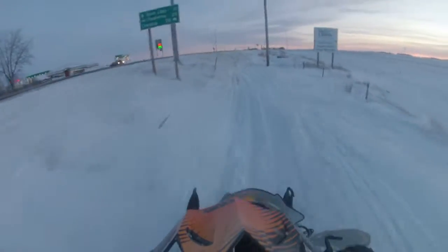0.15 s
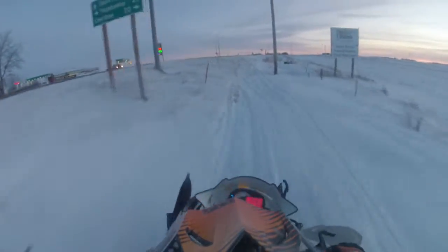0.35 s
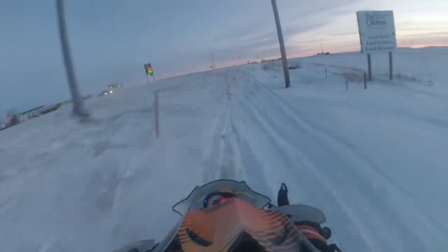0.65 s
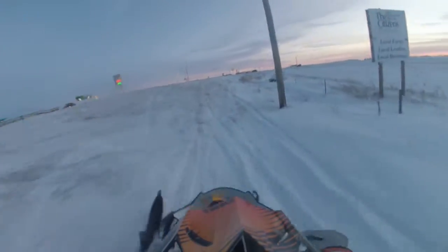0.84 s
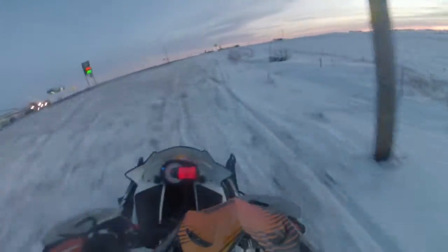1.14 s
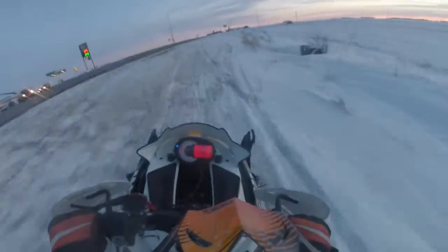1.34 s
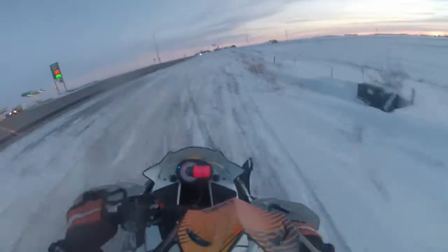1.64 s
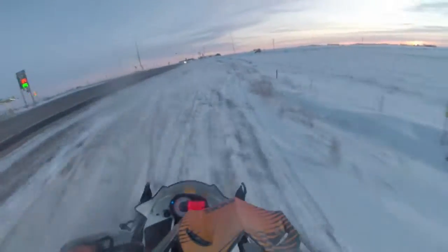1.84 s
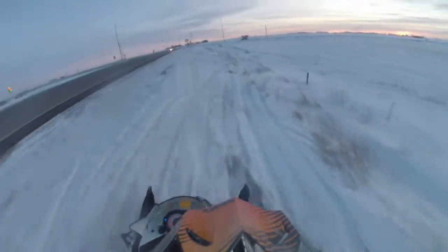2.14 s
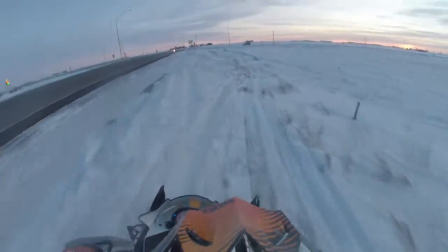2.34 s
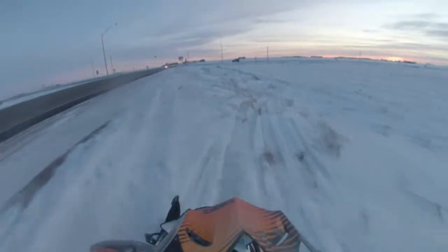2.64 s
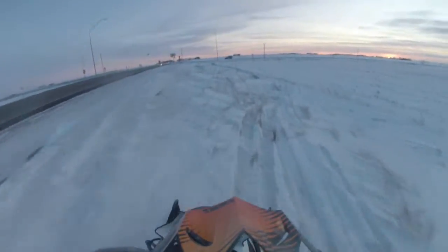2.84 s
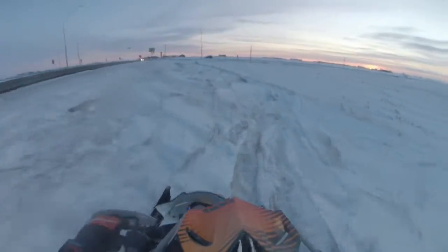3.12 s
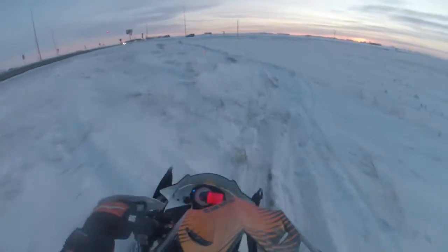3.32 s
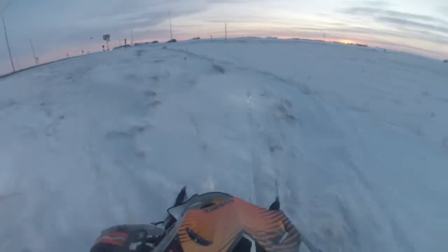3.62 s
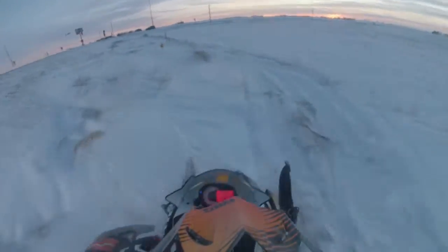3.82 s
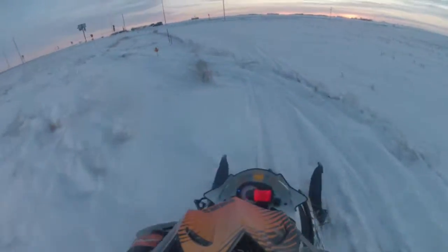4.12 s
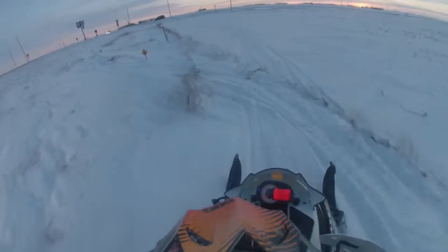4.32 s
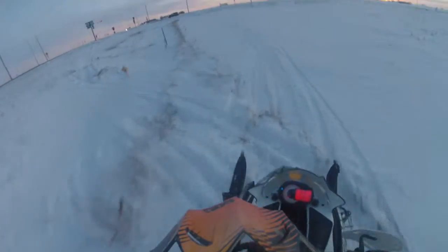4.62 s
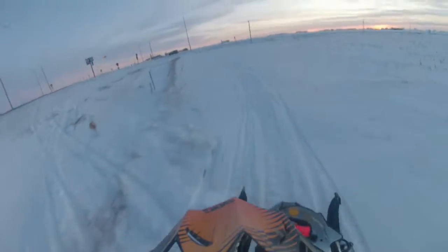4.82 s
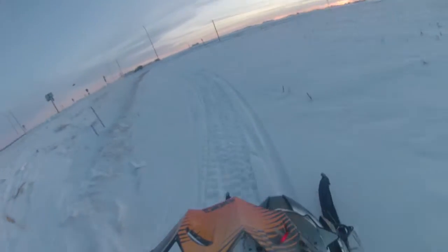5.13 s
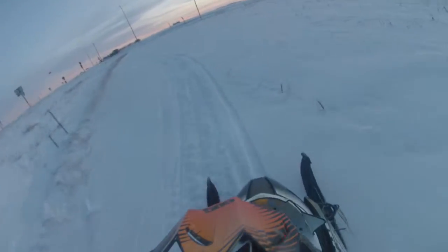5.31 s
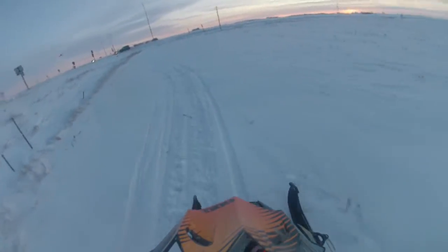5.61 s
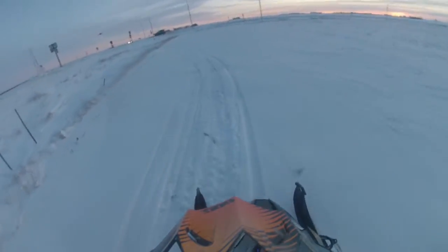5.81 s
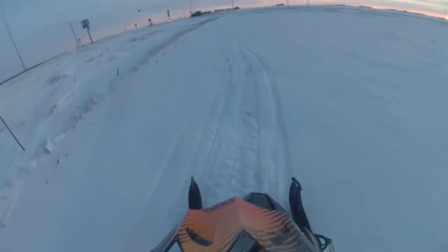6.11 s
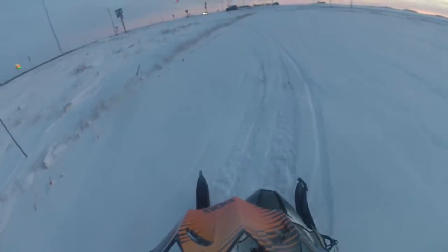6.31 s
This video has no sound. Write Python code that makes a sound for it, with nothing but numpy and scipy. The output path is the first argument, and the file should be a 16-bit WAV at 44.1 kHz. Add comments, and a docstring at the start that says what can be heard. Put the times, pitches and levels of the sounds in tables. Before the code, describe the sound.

A two-stroke snowmobile revs hard through buffeting wind and hissing snow, coasts down to idle, then gives four short throttle blips.

```python
"""A two-stroke snowmobile on hard snow, heard from a camera case on the rider's helmet.
0-1.6 s: it revs up; the exhaust sings and rasps with each firing, and growls at the top.
Track and skis rush and sizzle on the snow, the chassis drones, wind buffets the case.
1.6-5 s: it coasts down to idle; snow and wind fade as the sled slows; an ice crumb ticks on the case.
From 5.1 s: four burbling blips of throttle, with a second crumb after the first blip."""
import sys
import numpy as np
from scipy import signal
from scipy.fft import rfft, irfft, next_fast_len
from scipy.io import wavfile
from scipy.ndimage import uniform_filter1d, map_coordinates

SR = 44100
rng = np.random.default_rng(int(sys.argv[2]) if len(sys.argv) > 2 else 0)


def waveform_to_disk(signal):
    """Save audio, clipped to [-1, 1], as 16-bit WAV at the path in sys.argv[1]."""
    frames = np.transpose(np.atleast_2d(signal))
    scaled = np.clip(frames, -1, 1) * 32767
    samples = np.round(scaled).astype(np.int16)
    wavfile.write(sys.argv[1], SR, samples)


N = 284886

# how hard track and skis work the snow, mostly with speed: (time [s], pace [dB])
SLED_PACE = [(0, -0.5), (.55, -1), (.86, 0.9), (1.03, -1.5), (1.21, 2.5), (1.31, -1), (1.38, 4.5),
             (1.87, 6), (2.15, 2), (2.7, 0.5), (2.85, -2), (3.65, -5), (3.95, -8), (4.15, -8), (4.65, -14),
             (5.65, -13), (6.46, -19)]


def amp(db):
    """Decibels to gain."""
    return 10 ** (np.asarray(db) / 20)


def unit(x):
    """x at rms 1."""
    return x / np.sqrt(np.mean(x ** 2) + 1e-20)


def along(points, hz):
    """Interpolate (frequency, value) points on a log axis."""
    at_hz, values = np.transpose(points)
    return np.interp(np.log(hz + 1), np.log(at_hz + 1), values)


def curve(points):
    """Interpolate (time, value) points at every sample."""
    return np.interp(np.arange(N) / SR, *np.transpose(points))


def wobble(rate_hz):
    """Smooth random curve, rate_hz knots a second."""
    knots = rng.standard_normal(int(N * rate_hz / SR) + 4)
    coarse = np.arange(0, N + 16, 16)
    return np.interp(np.arange(N), coarse, map_coordinates(knots, [coarse * rate_hz / SR]))


def swell(at_s, width_s):
    """Gaussian rise and fall."""
    return np.exp(-((np.arange(N) / SR - at_s) / width_s) ** 2)


def noise():
    """White noise."""
    return rng.standard_normal(N)


def filtered(x, response):
    """x through a gain given as a function of frequency."""
    size = next_fast_len(N + 8192)
    return irfft(rfft(x, size) * response(np.fft.rfftfreq(size, 1 / SR)), size)[..., :N]


def coloured(x, spectrum):
    """x through a spectrum with steep skirts, at rms 1."""
    low_hz, high_hz = spectrum[0][0], spectrum[-1][0]
    skirt = lambda hz: np.clip(hz / low_hz, 0, 1) ** 4 / np.maximum(hz / high_hz, 1) ** 4
    return unit(filtered(x, lambda hz: amp(along(spectrum, hz)) * skirt(hz)))


def tone(order, phase, drift_rad=0):
    """Sine at a multiple of the firing rate, rms 1."""
    return np.sqrt(2) * np.sin(order * phase + drift_rad + rng.uniform(0, 2 * np.pi))


def partial(order, phase, firing_hz, spectrum, drift_rad=0):
    """Fluttering tone, weighted by the resonances it sweeps through."""
    return amp(along(spectrum, order * firing_hz) + 2.52 * wobble(35)) * tone(order, phase, drift_rad)


def engine():
    """Two cylinders fire in turn; load brings out the upper harmonics and the rasp."""
    # one long pull, track dragging the engine, then idle: (time [s], load over idle [dB])
    pull_and_drag = [(0, 1), (.22, 14.5), (.56, 10), (.72, 22), (.92, 27), (1, 22), (1.17, 32),
                     (1.31, 31.5), (1.42, 33.5), (1.58, 30), (1.72, -15), (2.6, -16)]
    idle = [(3.6, 0)]
    load_db = curve(np.vstack([pull_and_drag, idle]))
    blip_db, tilt_db, burble_gain, ring_gain = throttle_blips()
    firing_hz = firing_rate(blip_db)
    phase = 2 * np.pi * np.cumsum(firing_hz * (1 + 0.00476 * wobble(45))) / SR  # no two burns alike
    hum = amp(-41.3 + .38 * load_db + .75 * blip_db) * exhaust_hum(phase, firing_hz, tilt_db)
    bite_gain = amp(-67 + load_db + .6 * blip_db)
    exhaust = hum + bite_gain * pipe_song(phase, firing_hz) + growl(phase, firing_hz)
    ring, rasp = engine_casing(phase, firing_hz)
    casing = ring_gain * ring + (bite_gain + amp(-49)) * rasp  # rattles even with the throttle shut
    return exhaust + casing + burble_gain * burble(phase)


def throttle_blips(ramp_s=0.054):
    """Thumb on the throttle: curves of load [dB], tilt [dB/harmonic], burble gain and ring gain."""
    # (start [s], length [s], load [dB], tilt [dB/harmonic], burble [dB], casing ring [dB])
    blips = [(5.11, .19, 8.5, 4, -46, -56), (5.54, .19, 7, 4, -39, -46), (5.99, .19, 9, .5, -39, -45),
             (6.33, .16, 9.5, .5, -42, -42.5)]
    starts_s, lengths_s, load_db, tilt_db, burble_db, ring_db = np.transpose(blips)
    ramp = lambda at_s: np.clip((np.arange(N) / SR - at_s) / ramp_s + .5, 0, 1)
    gates = np.array([ramp(on_s) - ramp(off_s) for on_s, off_s in zip(starts_s, starts_s + lengths_s)])
    return load_db @ gates, tilt_db @ gates, amp(burble_db) @ gates, amp(ring_db) @ gates


def firing_rate(blip_db, flywheel_s=.055, hz_per_db=1.64):
    """Firing rate [Hz]; the flywheel makes the revs lag each blip."""
    # revs climb, sink to idle, then the clutch holds them a little higher: (time [s], firing rate [Hz])
    pull = [(0, 157.4), (.1, 163.1), (.22, 174.9), (.32, 185.4), (.43, 189.5), (.6, 190.8), (.71, 203),
            (.81, 226), (.95, 236.6), (1.08, 250.5), (1.21, 254.7), (1.42, 267.3), (1.55, 266.7),
            (1.6, 258.7)]
    coast = [(1.66, 238), (2, 169.7), (3.3, 135.2), (3.999, 120.1), (5.13, 122), (5.28, 128.9),
             (6.46, 131.2)]
    pole = np.exp(-1 / (flywheel_s * SR))
    lagged = lambda x: signal.lfilter([1 - pole], [1, -pole], x)
    return curve(np.vstack([pull, coast])) + hz_per_db * lagged(lagged(blip_db))


def exhaust_hum(phase, firing_hz, tilt_db, rough_rad=.28):
    """Harmonics 1-3: the tuned exhaust favours each at different revs; uneven burns shake them."""
    # (firing rate [Hz], harmonic 1 [dB], harmonic 2 [dB], harmonic 3 [dB])
    tuning = [(122, 0, -14, -19), (131, 0, -14, -21), (141, -1, -18, -22), (155, -2, -12, -17),
              (176, 0, -10, -4), (189, 1, -9, -8), (197, -3, -1, -19), (214, 1, -3, -18),
              (233, 1.5, -3, -12), (243, 0, -14, -13), (256, .5, -21, -8), (267, 6, -8, -4)]
    at_hz, *harmonics_db = np.transpose(tuning)
    out = np.zeros(N)
    for order, tuned_db in enumerate(harmonics_db, 1):
        level_db = np.interp(firing_hz, at_hz, tuned_db) + (order - 1.5) * tilt_db + 2 * wobble(30)
        out += amp(level_db) * tone(order, phase, rough_rad * wobble(60))
    return out


def pipe_song(phase, firing_hz):
    """The pipe sings on harmonics 4-15; unequal cylinders add rough half-order lines."""
    # pipe resonances: (frequency [Hz], gain [dB])
    pipe = [(400, -7), (590, -14), (660, -7), (800, -0.5), (950, -15), (1015, 4.5), (1075, 4), (1170, -4.5),
            (1330, 5.5), (1600, -6.5), (2000, 4), (2400, 1.5), (2680, 0), (2950, -14)]
    song = sum(partial(k, phase, firing_hz, pipe) for k in range(4, 16))
    uneven = sum(partial(k + .5, phase, firing_hz, pipe, wobble(50)) for k in range(1, 11))
    return song + amp(-13) * uneven


def growl(phase, firing_hz, onset_hz=258.3, full_hz=264.9):
    """Uneven burns at top revs add lines between harmonics 2 and 3."""
    lines = unit(tone(7 / 3, phase, wobble(45)) + tone(5 / 2, phase, wobble(45)))
    return amp(-37.5) * np.interp(firing_hz, [onset_hz, full_hz], [0, 1]) * lines


def engine_casing(phase, firing_hz):
    """The casing rings on harmonics 9-16 and rasps with a puff of noise per firing."""
    # casing resonances: (frequency [Hz], gain [dB])
    casing = [(700, -3.5), (1150, -6), (1370, -10), (1510, 7), (1680, -5), (1850, -18), (1950, 4),
              (2100, -12), (2400, -2), (3000, -36), (3500, -10), (5900, -43), (6600, -18), (8500, -29),
              (9200, -23), (10100, -40), (11300, -24.5), (15000, -44)]
    ring = unit(sum(partial(k, phase, firing_hz, casing) for k in range(9, 17)))
    puffs = (1 + np.cos(phase)) ** 2 * (1 + 0.22 * np.cos(phase / 2))
    return ring, coloured(noise() * puffs, casing)


def burble(phase):
    """At low revs about every third burn is weak: a throb below the firing rate."""
    # irregular burns: (frequency [Hz], relative density [dB])
    burns = [(70, -26), (92, -8), (115, -2), (170, -6), (230, -13.5), (420, -12), (700, -27)]
    throb = tone(2 / 3, phase, wobble(20))
    return unit(throb + coloured(noise(), burns))


def track_and_skis(pace_db):
    """Track and skis grind through snow: a low thudding and a mid-band rush."""
    # both: (frequency [Hz], relative density [dB])
    thud_spectrum = [(180, -5.5), (300, 2), (420, -0.5), (600, -4), (740, -1), (920, -6.5), (1200, -2),
                     (1800, -26)]
    rush_spectrum = [(850, -28), (1000, -19), (1150, -7.5), (1300, -4.5), (1420, 2), (1650, -3),
                     (1900, -0.5), (2250, 0), (2420, -5.5), (2620, -5), (2850, -14.5), (3200, -23)]
    thud = amp(-39.5 + pace_db + 0.26 * wobble(24)) * coloured(noise(), thud_spectrum)
    rush = amp(-27 + 0.97 * pace_db) * coloured(noise() * amp(0.14 * wobble(150)), rush_spectrum)
    return thud + rush


def snow_spray(pace_db, fine_hz=8000):
    """The crust breaks in tiny bursts, coloured by the camera case; finer and brighter at speed."""
    # spray: (frequency [Hz], relative density [dB])
    sizzle = [(2300, -42), (2900, -1), (3500, 0), (4300, -4), (5200, -3.5), (5800, -6.5), (7200, -8),
              (8000, -11), (10000, -16.5), (12200, -17.5), (13200, -22.5), (15200, -27)]
    # camera case resonances: (centre [Hz], width [Hz], lift [dB])
    case_modes = [(3924, 160, 6), (4570, 220, 5), (4950, 390, 6), (6540, 570, 7), (8640, 670, 2.5)]
    lift_db = lambda hz: sum(db / (1 + (2 * (hz - centre) / width) ** 2)
                             for centre, width, db in case_modes)
    grains = noise() * amp(0.83 * wobble(700) + 0.66 * wobble(20))
    spray = coloured(filtered(grains, lambda hz: amp(lift_db(hz))), sizzle)
    fine = filtered(spray, lambda hz: hz ** 4 / (hz ** 4 + fine_hz ** 4))
    return amp(-36 + 1.095 * pace_db) * (spray + (amp(0.19 * pace_db) - 1) * fine)


def wind(pace_db, slow_hz=42.6):
    """Eddies buffet the camera case and grow with the pace; gusts swell the slowest."""
    # eddies: (frequency [Hz], relative density [dB])
    buffet = [(8, -4.5), (16, 2), (24, -13.5), (33, -1), (42, 0.5), (48, -1), (57, -21), (75, -25),
              (140, -45)]
    # gusts and helmet jolts: (time [s], half-width [s], lift [dB])
    gusts = [(0.08, 0.042, 9), (.38, .14, 10), (1.001, 0.11, 10), (1.271, 0.034, 11), (1.445, 0.054, 6),
             (1.792, 0.077, 5.5), (3.131, 0.1, 9), (3.762, 0.082, 7.5), (4.507, 0.033, 7),
             (5.332, 0.086, 11.5), (5.822, 0.061, 8), (6.049, 0.082, 8.5), (6.414, 0.05, 11.5)]
    gust_db = sum(db * swell(at_s, width_s) for at_s, width_s, db in gusts)
    eddies = coloured(noise(), buffet)
    power = np.abs(uniform_filter1d(eddies ** 2, size=3000))
    eddies = unit(eddies / np.sqrt(power + 1e-4))  # even out their strength
    slow = unit(filtered(eddies, lambda hz: 1 / (1 + (hz / slow_hz) ** 4)))
    return amp(-24 + .65 * pace_db + 1.6 * wobble(18)) * (eddies + (amp(gust_db) - 1) * slow)


def chassis_drone():
    """The chassis drones: low noise peaking at 210 Hz."""
    # (time [s], level [dB])
    levels = [(0, -33), (1.45, -29.5), (2.5, -33), (3.2, -36.5), (5.03, -40), (5.15, -43), (6.46, -43)]
    # (frequency [Hz], relative density [dB])
    chassis = [(45, -21), (65, -5), (100, -2.5), (150, -4.5), (188, -2.5), (210, 7), (232, -5),
               (300, -15.5), (450, -21.5)]
    return amp(curve(levels)) * coloured(noise(), chassis)


def bumps():
    """Ruts thump the chassis, hard patches scrape the skis: short swells of narrow noise."""
    # (time [s], level [dB], half-width [s], centre [Hz], bandwidth [Hz])
    hits = [(0.245, -20, 0.017, 197, 48.7), (1.24, -29, 0.029, 150, 130), (2.661, -31, 0.029, 1421, 120),
            (3.166, -30.5, 0.045, 1393, 139.5), (4.656, -32.5, 0.062, 160, 100)]
    out = np.zeros(N)
    for at_s, db, width_s, centre_hz, width_hz in hits:
        band = unit(filtered(noise(), lambda hz: np.exp(-2 * ((hz - centre_hz) / width_hz) ** 2)))
        out += amp(db) * band * swell(at_s, width_s)
    return out


def ice_crumbs(tick_t60_s=0.0094, knock_delay_s=0.0027, knock_width_s=0.00095):
    """Ice hits the camera case: a sharp tick, then a short knock as the wall flexes."""
    # (time [s], tick level [dB], knock over tick [dB])
    impacts = [(3.586, -39, -26), (5.302, -31, 10.5)]
    # (frequency [Hz], relative density [dB])
    tick_spectrum = [(1500, -6), (3500, -2), (6200, -2), (9800, -11), (11800, -3), (13000, -7),
                     (14500, -16)]
    out, t = np.zeros(N), np.arange(1024) / SR
    wall_modes = np.sin(2 * np.pi * 2150 * t) + 0.5 * np.sin(2 * np.pi * 3450 * t)
    knock = wall_modes * np.exp(-((t - knock_delay_s) / knock_width_s) ** 2)
    for at_s, db, knock_db in impacts:
        tick = coloured(noise(), tick_spectrum)[:len(t)] * amp(-60 * t / tick_t60_s)
        out[round(at_s * SR):][:len(t)] += amp(db) * (tick + amp(knock_db) * knock)
    return out


def scene():
    """One microphone inside the case, on both channels."""
    pace_db = curve(SLED_PACE)
    mono = engine() + wind(pace_db) + chassis_drone()
    mono += track_and_skis(pace_db) + snow_spray(pace_db) + bumps() + ice_crumbs()
    return np.array([mono, mono])


def record(dry, top_hz=15300):
    """The camera's band limit."""
    return filtered(dry, lambda hz: hz < top_hz)


dry = scene()
out = record(dry)
waveform_to_disk(out)
```